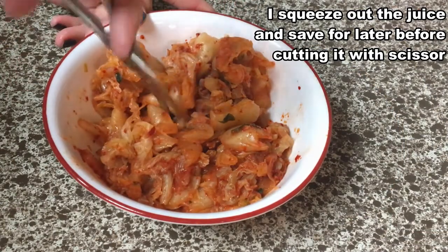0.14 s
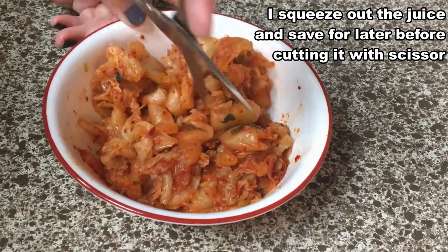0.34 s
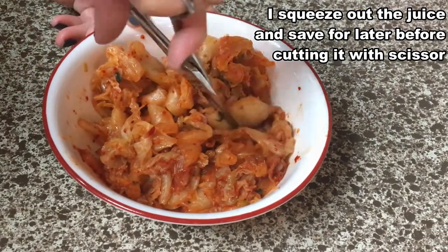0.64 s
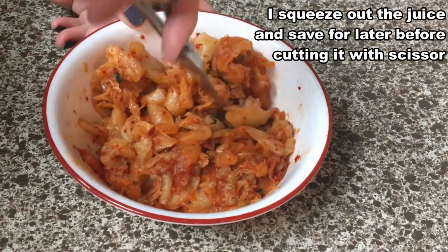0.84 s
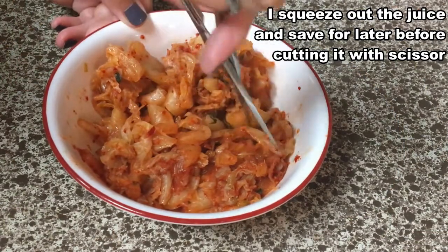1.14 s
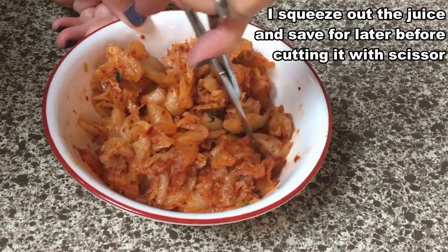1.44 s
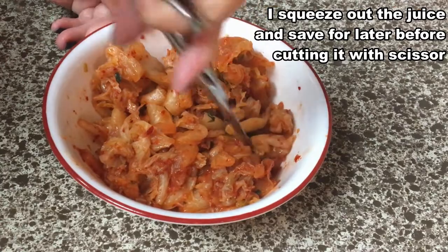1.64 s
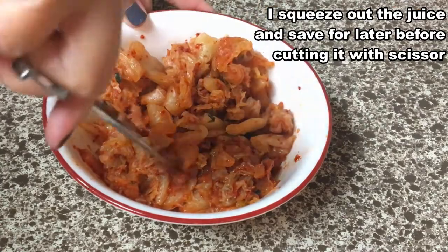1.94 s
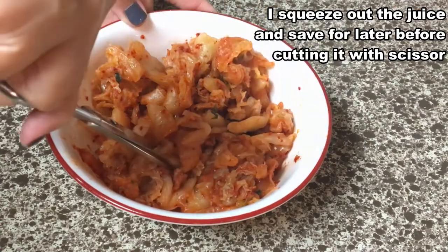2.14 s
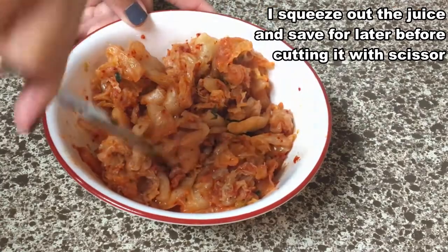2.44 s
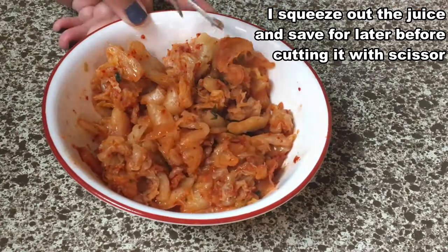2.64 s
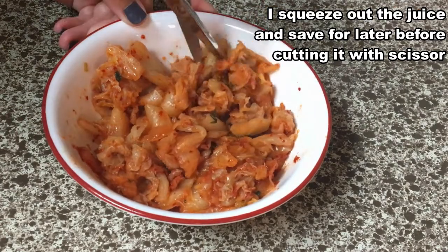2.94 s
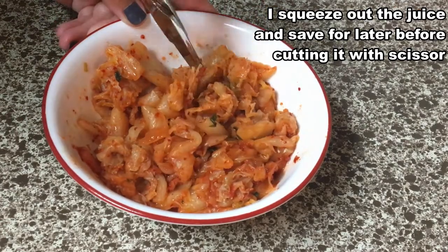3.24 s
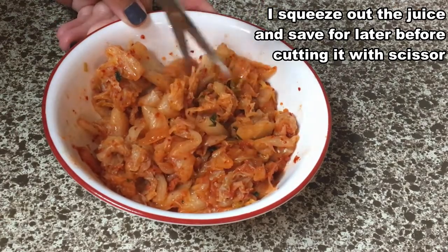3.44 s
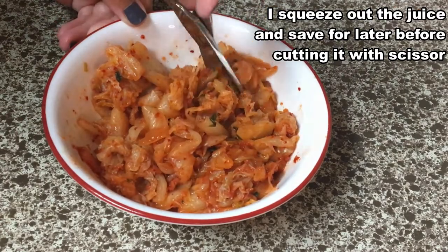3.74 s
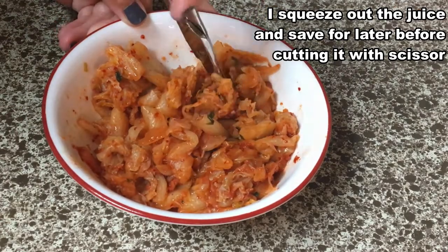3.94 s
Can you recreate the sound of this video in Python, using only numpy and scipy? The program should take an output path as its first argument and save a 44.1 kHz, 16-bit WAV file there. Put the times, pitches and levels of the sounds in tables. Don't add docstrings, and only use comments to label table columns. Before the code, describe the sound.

A close phone pickup of steel kitchen scissors cutting soft, juicy cabbage in a ceramic bowl on a stone counter. A bright snap with a short ring around 7 kHz opens the sound at 0.0 s, with wet squish and a light thud. At 0.6 s leaves crunch and the bowl bumps, then a softer, duller snap lands at 0.75 s. Small squeaks from 1.3 s lead to a pivot-heavy snap at 1.58 s with a clear bowl knock. Crunching at 2.1 s precedes the loudest, clean-ringing snap at 2.33 s. Fibre ticks and shearing build from 2.9 s to a bright snap and low bowl thump at 3.24 s. Crushing at 3.75 s ends in a snap and hard ceramic clack at 3.97 s. Blades slide open faintly about 0.15 s after most snaps. Wet squelches swell and release, over a low unsteady refrigerator hum and short hard-walled room reverberation.

```python
import sys
import numpy as np
from scipy import signal
from scipy.fft import rfft, irfft, next_fast_len
from scipy.io import wavfile
from scipy.ndimage import uniform_filter1d, minimum_filter1d, map_coordinates

SR = 44100
rng = np.random.default_rng(int(sys.argv[2]) if len(sys.argv) > 2 else 0)


def gain_from_db(level_db):
    decades = np.asarray(level_db, float) / 20
    return 10 ** decades


def persist_wave(psi):
    counts = np.round(np.clip(psi, -1, 1) * 32767).astype(np.int16)
    wavfile.write(sys.argv[1], SR, np.atleast_2d(counts).T)


N = 180587
LEAD = 600


def unit(x):
    return x / np.sqrt(np.mean(x ** 2) + 1e-20)


def along(points, hz):
    f, v = np.transpose(points)
    return np.interp(np.log(hz + 1), np.log(f + 1), v)


def shaped(n, gain):
    m = next_fast_len(n)
    spectrum = rfft(rng.standard_normal(m)) * gain(np.fft.rfftfreq(m, 1 / SR))
    return unit(irfft(spectrum, m)[:n])


def patchy(gain, n):
    z = signal.stft(shaped(n + 256, gain), nperseg=256)[2]
    field = uniform_filter1d(rng.standard_normal(z.shape), size=9, axis=0)
    field = uniform_filter1d(field, size=5, axis=1)
    return unit(signal.istft(z * gain_from_db(3 * unit(field)), nperseg=256)[1][:n])


def hump(centre_hz, octaves):
    return lambda hz: np.exp(-.5 * (np.log2((hz + 1) / centre_hz) / np.clip(octaves, .1, 3)) ** 2)


def wobble(knots_per_s):
    knots = rng.standard_normal(int(N * knots_per_s / SR) + 4)
    return map_coordinates(knots, [np.arange(N) * knots_per_s / SR])


def swell(length_s, rise, n):
    t = (np.arange(n) - LEAD) / SR / np.clip(length_s, .0005, .04)
    return np.where(t < 0, np.exp(-(t / rise) ** 2), np.exp(-np.abs(t)))


def ring(modes, force, grip_s, free_db):
    t = np.arange(SR // 4) / SR
    hz, db, t60_s = np.repeat(modes, 2, axis=0).T[:, :, None]
    chance = rng.standard_normal((2, len(hz), 1))
    hz = hz * (1 + 0.0099 * chance[0])
    drift = np.cumsum(rng.standard_normal((len(hz), len(t))), axis=1) * np.sqrt(hz / 5e5)
    dying = gain_from_db(-60 * t / grip_s) + gain_from_db(free_db - 60 * t / np.clip(t60_s, .02, .3))
    partials = gain_from_db(db + 2.0 * chance[1]) * dying * np.sin(2 * np.pi * hz * t + drift)
    out = signal.fftconvolve(force, np.sum(partials, axis=0))[:len(t)]
    return out / np.max(np.abs(out))


def add(track, s, sound):
    part = track[round(s * SR):][:len(sound)]
    part += sound[:len(part)]


def bursts(rows, octaves, broad_db):
    track = np.zeros(N + LEAD)
    n = SR // 8
    for s, db, centre_hz, length_s in rows:
        lumps = gain_from_db(15 * uniform_filter1d(rng.standard_normal(n), size=60))
        colour = lambda hz: hump(centre_hz, octaves)(hz) + gain_from_db(broad_db) * hump(7000, 1.1)(hz)
        grain = unit(lumps * patchy(colour, n))
        add(track, s, gain_from_db(db - 5.5) * swell(length_s, 0.99, n) * grain)
    return track[LEAD:]


# start in seconds, peak in dB, upper blade ring in dB,
# pivot body in dB, broad crack in dB.
SNAPS = [
    (0.014, -14.5, 4, -19.5, -5),
    (0.751, -20.5, 1, -5, 2.5),
    (1.5756, -18, 2, -1, -4.5),
    (2.3270, -10.5, -7, -27.5, -11.5),
    (3.241, -12, 1.5, -18, -3),
    (3.966, -14.5, -1, -9.5, -12.5),
]
# frequency in Hz, level in dB, t60 in seconds.
BLADE_MODES = [(6960, -2.5, 0.33), (7160, 9.5, 0.5), (7000, 3.5, 0.2), (7270, 4.5, 0.33),
               (7340, -12.5, 0.13), (8300, -11.5, .06)]
UPPER_MODES = [(12060, -4, .1), (12180, -1, 0.2), (12650, -18, 0.66), (12900, -7.5, 0.15), (13000, 0, .05),
               (14900, -1.5, .05)]
PIVOT_MODES = [(2100, -15.5, 0.15), (3250, 4, 0.15), (3900, -3, 0.08), (4650, -2, 0.067), (5230, -1, 0.2),
               (5210, 9, 0.18)]
# frequency in Hz, density in dB per Hz.
CRACK_SPECTRUM = [(710, -51), (1200, -25.5), (2860, -10), (3550, -18), (4550, -7), (6100, -13.5),
                  (7020, -2.5), (9210, -19.5), (13500, -10), (16000, -26.5)]


def snaps():
    track = np.zeros(N + LEAD)
    slap_s, free_db = 0.0039, -20.5
    n = SR // 10
    force = lambda: swell(slap_s, 0.89, n) * rng.standard_normal(n)
    colour = lambda hz: gain_from_db(along(CRACK_SPECTRUM, hz)) / (1 + (1500 / (hz + 1)) ** 4)
    for s, db, upper_db, pivot_db, crack_db in SNAPS:
        sound = ring(BLADE_MODES, force(), 0.06, free_db)
        sound += gain_from_db(upper_db) * ring(UPPER_MODES, force(), 0.02, free_db + 0.5)
        sound += gain_from_db(pivot_db) * ring(PIVOT_MODES, force(), 0.015, free_db - 0.5)
        crack = swell(slap_s * 1.31, 0.76, len(sound)) * patchy(colour, len(sound))
        add(track, s + 0.0013, gain_from_db(db - 0.5) * (sound + gain_from_db(crack_db) * crack))
    return track[LEAD:]


# start in seconds, peak in dB, centre in Hz, length in seconds.
SHEARS = [(0.591, -46, 8300, 0.0066), (0.601, -40, 8800, 0.0095), (.680, -32.5, 6300, .006),
          (1.544, -36.5, 3400, 0.007), (2.06, -61, 11000, 0.01), (2.294, -41.5, 7500, 0.007),
          (2.319, -37.5, 8500, 0.015), (2.926, -51, 7850, 0.0077), (0.624, -51, 9500, .02),
          (2.82, -54.5, 7500, .012), (3.12, -48.5, 4200, 0.0049), (3.156, -43.5, 8650, 0.011),
          (3.209, -48, 8200, 0.0066), (3.917, -55.5, 8600, 0.033), (3.96, -58, 8650, 0.007)]


def shears():
    return bursts(SHEARS, octaves=0.13, broad_db=1.5)


# start in seconds, peak in dB, centre in Hz, length in seconds.
CRUSHES = [
    (0.578, -41.5, 2360, 0.0068),
    (3.026, -51, 3500, 0.0041),
    (3.740, -39, 2240, 0.0044),
    (3.763, -41, 3000, 0.0058),
    (3.885, -63, 3200, 0.002),
    (3.96, -34, 2490, 0.014),
    (2.09, -42.5, 2450, 0.01),
    (3.208, -48, 2360, 0.0048),
]


def crushes():
    return bursts(CRUSHES, octaves=0.37, broad_db=-17)


# start in seconds, peak in dB, centre in Hz, length in seconds.
SQUEAKS = [(.489, -61, 3980, .003), (0.583, -54, 12500, 0.0031), (1.329, -45, 3600, 0.0038),
           (1.388, -52.5, 3720, 0.0059), (1.484, -52, 3770, 0.0032), (1.498, -44.5, 3530, 0.0059),
           (1.578, -28, 3900, 0.011), (2.005, -49, 4020, 0.009), (2.232, -56, 11700, 0.023),
           (2.243, -54.5, 3900, 0.025), (2.818, -59, 11600, 0.014), (3.670, -60.5, 3220, 0.0075),
           (3.915, -50, 2920, 0.03)]


def squeaks():
    return bursts(SQUEAKS, octaves=0.11, broad_db=-20.5)


# start in seconds, peak in dB, centre in Hz.
FIBRE_TICKS = [(0.23, -42.5, 7450), (0.505, -60, 9900), (.526, -54, 7000), (0.573, -54.5, 6770),
               (1.339, -60, 12700), (1.406, -53.5, 10000), (2.017, -52.5, 8900), (2.045, -54, 6100),
               (2.098, -39.5, 6560), (2.902, -46.5, 7160), (2.974, -48, 7700), (2.996, -50, 8140),
               (3.015, -50, 6400), (3.058, -62.5, 7500), (3.19, -42, 8260), (3.798, -43, 7000),
               (3.835, -50, 7300)]


def fibre_ticks():
    return bursts([(*row, .0033) for row in FIBRE_TICKS], octaves=0.11, broad_db=-10.5)


# start in seconds, peak in dB, centre in Hz.
JUICE_FLICKS = [(0.416, -54, 13000), (0.432, -55, 13000), (0.561, -53, 10500), (.972, -60, 13000),
                (1.255, -53, 13000), (1.452, -58, 13000), (1.987, -61, 13300), (2.072, -47, 8000),
                (2.453, -47.5, 12600), (2.803, -47, 9000), (2.892, -58, 12000), (3.004, -55, 11000),
                (3.046, -57, 12000), (3.109, -56, 14000)]


def juice_flicks():
    return bursts([(*row, .0012) for row in JUICE_FLICKS], octaves=0.5, broad_db=-11)


# start in seconds, peak in dB, centre in Hz.
OPENINGS = [
    (.155, -50.5, 7150),
    (0.907, -48, 7740),
    (1.737, -49.5, 8700),
    (2.486, -43.5, 7240),
    (3.420, -45.5, 9400),
]


def openings():
    open_s, tips_early_s, tips_hz, tips_db = .015, 0.0066, 13000, -5.5
    slides = [(*row, open_s) for row in OPENINGS]
    tips = [(s - tips_early_s, db + tips_db, tips_hz, 0.66 * open_s) for s, db, _ in OPENINGS]
    return bursts(slides, octaves=0.047, broad_db=-3.5) + bursts(tips, octaves=0.043, broad_db=0)


# start in seconds, peak in dB, brightness in Hz,
# spread in octaves, counter thud in dB.
KNOCKS = [(0.018, -38, 1485, 1.1, 7), (0.339, -51.5, 1200, 0.6, 9), (0.597, -32.5, 534, 0.44, -3.5),
          (0.604, -29.5, 435, 0.71, -2.5), (.679, -46, 400, 0.81, -2), (.774, -31.5, 916, 1.34, -19),
          (0.778, -29.5, 466, 0.48, -3), (1.586, -18.5, 1380, 0.42, -7), (1.592, -23, 1200, 0.21, -9.5),
          (1.595, -26, 510, 0.56, -11), (1.63, -40.5, 1200, 0.47, -7), (2.089, -46.5, 800, 0.94, -20),
          (2.333, -43.5, 2100, .25, 9.5), (3.255, -23.5, 1285, 0.83, -13), (3.261, -23.5, 400, 0.9, 1),
          (3.29, -41, 1096, .7, -9), (3.739, -51, 1990, 0.88, 11), (3.767, -46.5, 700, 1.34, 9.5),
          (3.967, -14, 1920, 0.3, -18.5), (3.972, -12, 1460, 0.66, -10.5), (3.974, -27, 270, 0.65, -11),
          (4.01, -36, 1300, 0.58, -11), (3.978, -25.5, 1120, 0.64, -13)]
# frequency in Hz, level in dB, t60 in seconds.
BOWL_MODES = [(264, 21, 0.19), (436, 11, 0.041), (545, 9.5, 0.2), (751, 1.5, 0.055), (950, -10, 0.37),
              (1200, 3.5, 0.073), (1416, 0, 0.094), (1636, -6.5, 0.041), (2040, 1, 0.045),
              (2230, -2.5, 0.082), (2440, -10.5, .07), (3600, -2, .1)]
COUNTER_MODES = [(52.6, 5.5, 0.75), (81, -7, 0.27), (127, -4, 0.19), (192, 1.5, 0.076), (243, 0.5, 0.097)]


def knocks():
    track = np.zeros(N + LEAD)
    hard_s, soft_s, padded_db = 0.0026, 0.017, -45.5
    n = SR // 10
    for s, db, bright_hz, octaves, thud_db in KNOCKS:
        length_s = hard_s if db > padded_db else soft_s
        push = swell(length_s, 0.49, n) * shaped(n, hump(bright_hz, octaves))
        press = swell(0.00063, 0.45, n)
        press -= np.roll(press, 150)
        sound = ring(BOWL_MODES, push, .016, -27)
        sound = sound + gain_from_db(thud_db) * ring(COUNTER_MODES, press, 0.086, -8.5)
        sound[:n] += 0.43 * push
        add(track, s + .0015, gain_from_db(db + 3.5) * sound)
    return track[LEAD:]


REST_DB = -73
# time of most pressure in seconds, level in dB, build-up in dB per second.
SQUEEZES = [(0.0, -43.5, 100), (0.18, -56.5, 103), (.5, -64, 60), (0.6, -44, 330), (0.75, -41.5, 112),
            (1.33, -60.5, 56), (1.588, -42, 145), (2.348, -47, 69.5), (2.86, -65.5, 45.5),
            (3.23, -43, 101.5), (3.41, -67, 61), (3.879, -55.5, 69), (4.02, -54, 19)]


def pressure():
    release_db_per_s = 167
    s, db, build_db_per_s = np.transpose(SQUEEZES)[:, :, None]
    since = np.arange(N) / SR - s
    slope = np.where(since < 0, build_db_per_s, -release_db_per_s)
    return np.maximum(REST_DB, np.max(db + slope * since, axis=0))


def squeeze():
    press_db = pressure()
    fizz_db = REST_DB - 8.5 + 1.06 * (press_db - REST_DB)
    clumps_db = 2.2 * wobble(70) + 1.6 * wobble(300)
    pops = (rng.random(N) < 45 / SR) * rng.exponential(size=N)
    ticks = signal.lfilter([1], [1, -np.exp(-1 / (.0012 * SR))], pops)
    squelch = unit(gain_from_db(clumps_db) * (1 + .6 * ticks) * patchy(hump(2100, .8), N))
    fizz = unit(gain_from_db(1.3 * clumps_db) * (1 + .8 * ticks) * patchy(hump(7000, .65), N))
    return gain_from_db(press_db - 7.0) * squelch + gain_from_db(fizz_db) * fizz


# frequency in Hz, t60 in seconds.
ROOM_DECAY = [(150, 0.32), (1000, 0.31), (4000, 0.25), (12000, 0.099)]


def walls(x):
    out, step = np.zeros(N + SR), SR // 4
    for start in range(0, N, step):
        hz, t, z = signal.stft(rng.standard_normal(SR // 2), SR, nperseg=256)
        decay = gain_from_db(-60 * t / along(ROOM_DECAY, hz)[:, None])
        tail = signal.istft(z * decay, SR, nperseg=256)[1]
        wet = signal.fftconvolve(x[start:start + step], tail / np.linalg.norm(tail))
        out[start + 200:][:len(wet)] += wet
    return out[:N]


# frequency in Hz, width in Hz, level in dB rms.
HUM_LINES = [(58.5, 16, -57), (115.1, 1.9, -52), (183.9, 6.4, -55), (241, 28, -66), (348.3, 79, -57)]
# frequency in Hz, density in dB per Hz.
AIR_SPECTRUM = [(22, -18), (58, -6.5), (95, -21.5), (122, 1.5), (150, -3), (190, -9), (220, -11),
                (380, -20.5), (600, -22.5), (1100, -26), (2300, -34.5), (5000, -45.5), (10000, -50.5),
                (16000, -54.5)]


def kitchen():
    hum = np.zeros(N)
    for hz, width_hz, db in HUM_LINES:
        hum += gain_from_db(db) * shaped(N, lambda f: 1 / (1 + ((f - hz) / width_hz) ** 2))
    air = shaped(N, lambda f: gain_from_db(along(AIR_SPECTRUM, f)))
    return hum + gain_from_db(-43 - 8 + 2.1 * wobble(14.0)) * air


def scene():
    cutting = snaps() + shears() + crushes() + squeaks() + fibre_ticks() + juice_flicks()
    cutting += openings() + knocks()
    return (cutting + gain_from_db(-13.5) * walls(cutting) + squeeze() + kitchen())[None]


# centre in seconds, lowest affected frequency in Hz,
# share of the weak lines lost from 0 to 1.
STARVED = [(.064, 500, .6), (.18, 2000, .65), (.662, 1000, .8), (.735, 800, .85), (.83, 1500, .7),
           (1.04, 3500, .9), (1.2, 3500, .9), (1.36, 4000, .9), (1.64, 2200, .7), (1.862, 2000, .99),
           (2.245, 1800, .7), (2.385, 600, .65), (2.5, 1000, .75), (3.497, 2800, .9), (3.61, 4500, .9),
           (3.685, 2500, .95), (3.705, 2500, .95), (3.915, 800, .8), (4.078, 2500, .9)]


def starve(x):
    frame, kept_db, lift = 2048, 5, 0.3
    out, hz = np.pad(x, ((0, 0), (0, frame))), np.fft.rfftfreq(frame, 1 / SR)
    for s, low_hz, lost in STARVED:
        start = round(s * SR) - frame // 2
        z = rfft(out[:, start:start + frame] * np.hanning(frame))
        near = np.sqrt(np.abs(uniform_filter1d(np.abs(z) ** 2, size=48)))
        weak = minimum_filter1d(1 * (np.abs(z) < gain_from_db(kept_db) * near), size=3)
        removed = z * (hz > low_hz) * (lost * weak - lift * (1 - weak))
        out[:, start:start + frame] -= irfft(removed, frame)
    return out[:, :N]


def band_limit(x):
    return signal.sosfilt(signal.butter(12, 16620, fs=SR, output="sos"), x)


def record(dry):
    hz = np.fft.rfftfreq(2 * N, 1 / SR)
    bass_cut = 1 / np.sqrt(1 + (40 / (hz + 1)) ** 4)
    top_cut = 1 / np.sqrt(1 + (hz / 15800) ** 160)
    heard = irfft(rfft(dry, 2 * N) * bass_cut * top_cut, 2 * N)[:, :N]
    return band_limit(starve(heard))


dry = scene()
out = record(dry)
persist_wave(out)
```